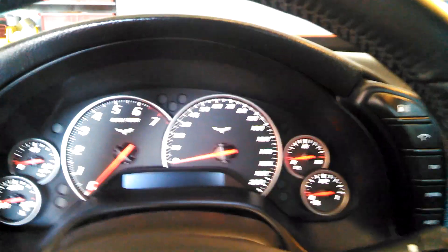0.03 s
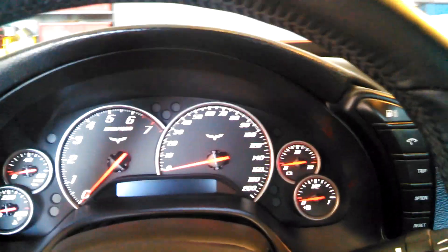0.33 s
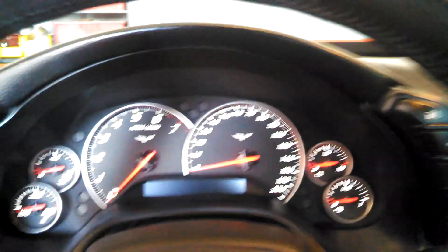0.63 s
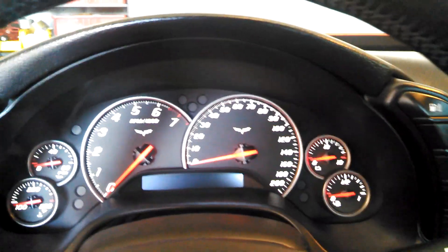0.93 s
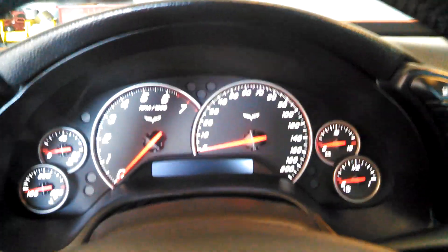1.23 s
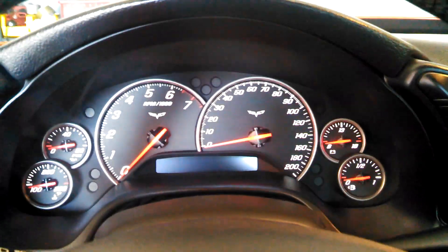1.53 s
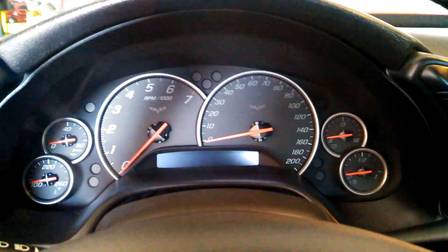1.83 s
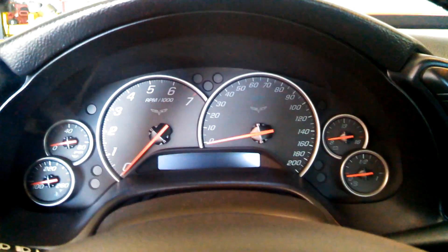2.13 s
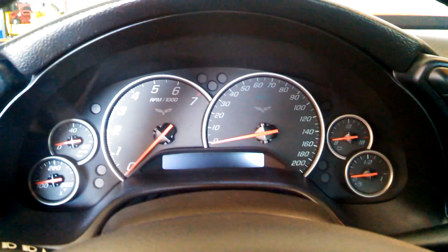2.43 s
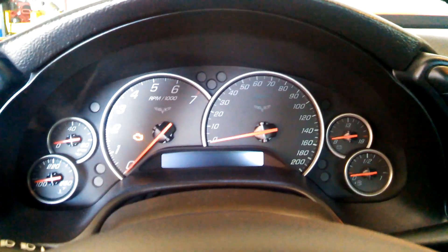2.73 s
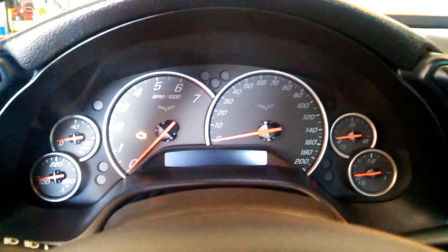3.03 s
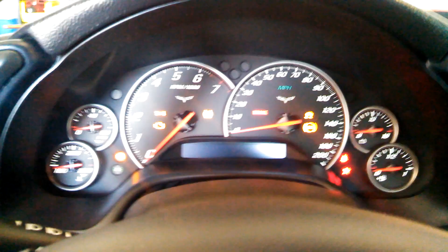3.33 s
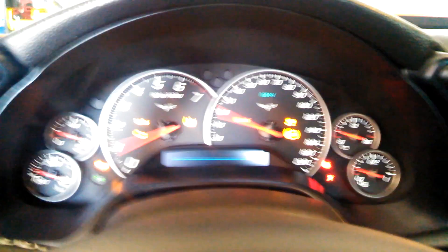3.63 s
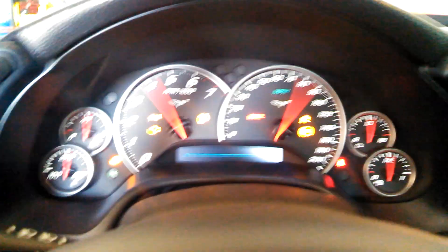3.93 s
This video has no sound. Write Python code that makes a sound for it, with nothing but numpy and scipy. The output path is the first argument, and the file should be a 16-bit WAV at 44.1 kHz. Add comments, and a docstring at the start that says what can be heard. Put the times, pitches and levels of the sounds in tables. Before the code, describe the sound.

A car engine cranks briefly and fires into a low, uneven roar that booms in the cabin. Before it come close handling rustle and knocks, two loud ignition pops with spits of hiss, and a faint fuel pump whir.

```python
"""Cold start of a V8 car

From the driver's seat, a hand rustles on a camera and knocks its buttons. Two sharp electrical
pops come with the ignition, among clicks and spits of hiss. The fuel pump whirs and the starter
heaves through four compressions. The engine catches, flares and settles, booming in the cabin."""
import sys
import numpy as np
from scipy import signal
from scipy.fft import rfft, irfft
from scipy.io import wavfile
from scipy.ndimage import uniform_filter1d

SR = 44100
rng = np.random.default_rng(int(sys.argv[2]) if len(sys.argv) > 2 else 0)


def generate_wav(signal):
    """Clip the signal to [-1, 1] and save it as 16-bit WAV at the path in sys.argv[1]."""
    frames = np.transpose(np.atleast_2d(signal))
    scaled = np.clip(frames, -1, 1) * 32767
    pcm = np.round(scaled).astype(np.int16)
    wavfile.write(sys.argv[1], SR, pcm)


N = 176400
T, HZ = np.arange(N) / SR, np.fft.rfftfreq(N, 1 / SR)
PORT_DELAY = 16  # samples between the two microphone openings


def amp(db):
    """Turns decibels into a gain."""
    return 10 ** (np.asarray(db) / 20)


def unit(x):
    """Scales a signal to an average (rms) level of 1."""
    return x / np.sqrt(np.mean(x ** 2) + 1e-20)


def shape(points):
    """Draws a gain for every frequency through (Hz, dB) points."""
    hz, db = np.transpose(points)
    return amp(np.interp(np.log(HZ + 1), np.log(hz), db))


def levels(rows):
    """Draws a gain over time for each dB column of a table."""
    s, *columns = np.transpose(rows)
    return [amp(np.interp(T, s, db)) for db in columns]


def band(lo_hz, hi_hz):
    """A gain that falls steeply outside two frequencies."""
    return 1 / np.sqrt((1 + (lo_hz / (HZ + 1)) ** 10) * (1 + (HZ / hi_hz) ** 10))


def tint(x, gain):
    """Filters a sound and scales it to level 1."""
    return unit(irfft(rfft(x) * gain, N))


def noise():
    """White noise in two rows: mid (what left and right share) and side (how they differ)."""
    return rng.standard_normal((2, N))


def wander(rate_hz):
    """A random wobble of level 1, mostly slower than rate_hz."""
    return tint(rng.standard_normal(N), 1 / (1 + (HZ / rate_hz) ** 4))


def add(mix, s, sound):
    """Lays a sound into the mix at s seconds."""
    part = mix[:, max(round(s * SR), 0):][:, :sound.shape[1]]
    part += sound[:, :part.shape[1]]


def hiss(flicker_db=1.12):
    """Bright, slightly grainy hiss."""
    # The tone of the hiss. Each row: frequency in Hz, gain in dB.
    colour = [(300, 5), (1200, -2), (2200, -2.5), (3000, -2), (4200, 0), (5700, -2), (7800, -0.5),
              (10000, -5.5), (11200, -7), (12800, 0.5), (15500, -2.5)]
    return tint(noise(), shape(colour) * band(540, 21000)) * amp(flicker_db * wander(67))


def handling(rumble_side_db=4, scrub_db=2):
    """A hand shifts on the camera, rumbling and rubbing unevenly over faint hiss."""
    # The rustle, early and late. Each row: time in seconds, then rumble, rub and treble in dB.
    early = [(0.0, -39, -56, -54.5), (0.1, -46, -45.5, -52), (0.17, -38.5, -39, -49.5),
             (0.225, -42, -50.5, -48.5), (0.284, -42, -55, -54.5), (0.41, -50.5, -57.5, -59.5),
             (0.542, -52, -58.5, -58.5), (0.698, -51.5, -59.5, -58.5), (1.15, -60.5, -60, -62.5),
             (1.38, -56, -60.5, -64.5)]
    late = [(1.42, -47, -47.5, -61.5), (1.52, -58, -56, -60.5), (1.75, -55, -54.5, -56.5),
            (1.79, -44, -43, -58), (1.9, -47, -47.5, -57.5), (1.98, -51.5, -55, -57)]
    # The tone of the rustle. Each row: frequency in Hz, gain in dB.
    colour = [(25, -10), (45, -5.5), (85, 5.5), (125, -1.5), (200, 3), (300, -4), (550, -6.5), (800, -10),
              (1200, -15), (1800, -19), (3000, -10)]
    rumble_gain, rub_gain, treble_gain = levels(list(early) + list(late))
    rumble = tint(noise(), shape(colour) * band(20, 365)) * amp([[0], [rumble_side_db]])
    rub = tint(noise(), shape(colour) * band(230, 2240)) * amp(scrub_db * wander(64))
    treble = tint(hiss(), shape([(2000, 0), (4500, -2), (7500, -3.5), (10500, -0.5), (14000, -1)]))
    return amp(-2) * rumble_gain * rumble + amp(1) * rub_gain * rub + amp(4) * treble_gain * treble


def knocks(clack_hz=1330, blow_hz=520, blow_s=0.00041, rise_s=0.0015):
    """Blunt taps on plastic: a short blow, a low ringing body, a clack and a faint tick."""
    # Each row is a tap: start in seconds, then blow, body, clack and tick in dB, ring length factor.
    taps = [(0.1098, -16.5, -33.5, -32, -37.5, 0.55), (0.266, -42, -45, -60, -62, 0.86),
            (0.327, -43, -42.5, -58, -63, 1), (0.405, -41, -41, -60, -60, 0.9),
            (0.425, -48, -47.5, -66, -63, 0.97), (0.44, -52, -49, -66, -61, 0.94),
            (0.575, -50, -47.5, -53, -60, 0.46), (0.675, -43, -45.5, -60, -65, 0.32),
            (0.737, -59, -66, -41.5, -46.5, 0.83), (0.747, -55, -59, -45, -57, 0.75),
            (1.266, -34, -36, -51, -51, 0.96), (1.418, -37, -43, -38.5, -39, 0.76),
            (1.867, -40, -32, -54, -62, 0.62)]
    # How the plastic rings. Each row: pitch in Hz, level in dB, seconds to fade by 60 dB (t60).
    modes = [(197, -10.5, 0.31), (403, -7, 0.069), (545, 8, 0.044), (690, -4, 0.023)]
    thump_t60, clack_t60, tick_t60 = 0.15, 0.064, 0.051
    out, t = np.zeros((2, N)), np.arange(SR // 5) / SR
    rattles, ticks, thumps = tint(noise(), band(850, 2300)), hiss(), tint(noise(), band(270, 750))
    for s, blow_db, body_db, clack_db, tick_db, ring_length in taps:
        here = slice(round(s * SR), round(s * SR) + len(t))
        age = t / max(ring_length, .1)  # a small factor speeds up the fades
        detune = 1 + 0.064 * rng.standard_normal(len(modes))
        ring = sum(amp(db - 60 * age / t60) * np.sin(2 * np.pi * hz * d * t)
                   for (hz, db, t60), d in zip(modes, detune))
        body = ring * np.array([[1], [.3]]) + 0.93 * thumps[:, here] * amp(-60 * age / thump_t60)
        clack = np.sin(2 * np.pi * clack_hz * t) * np.array([[1], [0]]) + 0.55 * rattles[:, here]
        sound = amp(body_db + 2) * body * np.minimum(t / rise_s, 1)
        sound += amp(clack_db + 2 - 60 * age / clack_t60) * clack
        sound += amp(tick_db + 4 - 60 * age / tick_t60) * ticks[:, here]
        sound[0] += amp(blow_db) * np.sin(2 * np.pi * blow_hz * t) * t / blow_s * np.exp(1 - t / blow_s)
        add(out, s + .002, sound * np.minimum(t / .0004, 1))
    return out


def scrape(grain_db=1.5):
    """Skin slides over plastic in a bright, fine-grained scrape."""
    # The slide of the hand. Each row: time in seconds, level in dB.
    slide = [(0.11, -85), (0.13, -43), (0.16, -37.5), (0.2, -42.5), (0.26, -56), (0.31, -57), (0.39, -49.5),
             (0.437, -51.5), (0.465, -66), (0.62, -62), (0.72, -84)]
    # The tone of the scrape. Each row: frequency in Hz, gain in dB.
    colour = [(1400, -2), (4000, -6), (6800, 2.5), (10000, 3), (14500, -0.5)]
    level, = levels(slide)
    return level * amp(grain_db * wander(300)) * tint(hiss(), shape(colour))


def pops(fall_s=.0035, cut_hz=54, left_share=.8):
    """As the ignition comes on, the voltage jumps and swings back, opposite in left and right."""
    # Each row is a pop: start in seconds, level in dB.
    jumps = [(1.4643, -4), (1.9175, 3.5)]
    # Each pop's rise time in seconds; the louder one is steeper.
    rises = [.00009, .00002]
    out, t = np.zeros((2, N)), np.arange(SR // 6) / SR
    bass_cut = signal.butter(4, cut_hz, "highpass", fs=SR, output="sos")
    for (s, db), rise_s in zip(jumps, rises):
        right = signal.sosfilt(bass_cut, (1 - np.exp(-t / rise_s)) * np.exp(-t / fall_s))
        left = -left_share * np.pad(right, (PORT_DELAY, 0))[:len(t)]
        add(out, s, amp(db) * np.array([left, right]))
    return out


def spits(snap_s=0.0029, grain_db=1.2):
    """Short snaps and spits of hiss; the last is microphone hiss following the second pop."""
    # Each row: start in seconds, snap and hiss in dB, seconds held, seconds to fade by 60 dB.
    bursts = [(1.558, -41, -38.5, 0.025, 0.32), (1.6613, -32, -41, 0.014, 0.084),
              (1.687, -40, -42.5, 0.0088, 0.053), (1.7413, -39, -39, 0.009, 0.06),
              (1.918, -56, -34, 0.044, 0.14)]
    level = np.zeros(N)
    for s, snap_db, hiss_db, hold_s, t60 in bursts:
        t = np.maximum(T - s, 0)
        level += amp(snap_db) * t / snap_s * np.exp((1 - (t / snap_s) ** 2) / 2)
        level += np.minimum(t / .001, 1) * amp(hiss_db - 60 * np.maximum(t - hold_s, 0) / t60)
    colour = shape([(400, -8), (1500, 3), (4000, 3.5), (7000, -1), (14000, 2.5)])
    return level * amp(grain_db * wander(740)) * tint(hiss(), colour)


def fuel_pump(tone_boost_db=43, hiss_db=-4.5, waver=0.00554, flutter_db=3):
    """The fuel pump spins with wavering, fluttering tones inside a noisy whir."""
    # The pump's loudness. Each row: time in seconds, level in dB.
    loudness = [(1.91, -83), (1.935, -33.5), (2.05, -42), (2.19, -37.5), (2.34, -43), (2.8, -32.5),
                (3, -69)]
    # Its tones. Each row: pitch in Hz, level in dB before the boost.
    whine = [(188.4, -57), (640.6, -57), (899.0, -57.5), (1432, -57.5)]
    # Its whir. Each row: frequency in Hz, gain in dB.
    colour = [(40, -27), (180, -12), (400, -15.5), (650, -3), (1400, -5), (2100, -8.5), (2800, 1),
              (5000, -19.5)]
    level, = levels(loudness)
    tones = np.zeros((2, N))
    for hz, db in whine:
        turns = np.cumsum(hz * (1 + waver * wander(38.7))) / SR
        gain = amp(db + tone_boost_db + flutter_db * wander(38))
        tones += gain * np.sqrt(2) * np.sin(2 * np.pi * (turns + rng.random((2, 1))))
    return level * (tones + tint(noise(), shape(colour)) + amp(hiss_db) * hiss())


def through_cabin(drive):
    """Sound from the engine bay rings the cabin and arrives as low thud, boom and higher roar."""
    # Where the cabin and car body ring. Each row: frequency in Hz, peak strength in dB.
    resonances = [(64, 11), (144, 9), (186, 8.5), (219, 8.5), (264, 5.5), (330, 12), (355, 13), (385, 5),
                  (481, 4.5), (611, 8), (676, 7.5), (760, 8), (796, 7), (820, 8), (891, 8), (995, 6),
                  (1206, 3.5), (1350, 4), (1435, 8.5)]
    # The broad tone of the path to the seat. Each row: frequency in Hz, gain in dB.
    colour = [(25, -38), (38, -31), (54, -11), (120, -5), (300, -1.5), (420, -5.5), (540, -3), (700, 0),
              (950, -5.5), (1300, 0), (1700, -8), (2200, -14), (3000, -7)]
    peaks = 0
    for hz, db in resonances:
        width_hz = 8.6 + 0.0047 * hz
        peaks += amp(db + 1) ** 2 / (1 + (2 * (HZ - hz) / width_hz) ** 4)
    path = shape(colour) * np.sqrt(1 + peaks)
    return [tint(drive, path * band(lo, hi)) for lo, hi in [(20, 110), (110, 420), (420, 2800)]]


def starter(groan_hz=186, groan_db=-3, rise_s=0.025, release_s=0.051):
    """Each compression gives a thud and a groan of gears; microphone hiss swells with each one."""
    # Each row: start and length in seconds, then thud, boom, gears and microphone hiss in dB.
    strokes = [(2.353, 0.1, -45, -31.5, -33, -32), (2.487, 0.088, -38, -34.5, -29, -30),
               (2.602, 0.08, -36, -28, -32, -29), (2.704, 0.078, -35.5, -23.5, -25, -27)]
    fades_db = [-3.5, -13, -5.5, -6]  # how those four layers fade over a stroke
    thud, boom, gears = through_cabin(noise() * amp(1.6 * wander(87)))
    turns = np.cumsum(groan_hz * (1 + 0.0404 * wander(30.8))) / SR
    groan = np.sin(2 * np.pi * (turns + rng.random((2, 1))))
    boom = unit(tint(boom, band(160, 230)) + amp(groan_db) * unit(groan))
    layers, out = (thud, boom, gears, hiss()), np.zeros((2, N))
    for s, length, *dbs in strokes:
        t = np.clip(T - s, 0, length + release_s)
        swell = np.minimum(t / rise_s, 1) * np.clip(1 - (t - length) / release_s, 0, 1)
        for db, fade_db, layer in zip(dbs, fades_db, layers):
            out += swell * amp(db + fade_db * t / length) * layer
    return out


def smear(x, mean_delay_s=.012):
    """Paths of different length spread each pulse out in time."""
    delay = mean_delay_s * (1 + np.sin(HZ / 37))
    return tint(x, np.exp(-2j * np.pi * np.cumsum(delay) * SR / N))


def engine(noise_share=0.78, uneven_db=1.33, puff_cycles=0.66, catch_s=2.797):
    """Uneven firings, each a pressure pulse and a puff of noise, ring the cabin."""
    # The engine's speed. Each row: time in seconds, firings per second.
    speed = [(2.8, 41.3), (2.87, 82), (2.95, 110.5), (3.07, 131), (3.25, 117.4), (3.55, 88), (3.85, 79),
             (4, 68.4)]
    # Each cylinder's strength in dB, in firing order.
    cylinders = [-8, -6, -6, -7, -7, -6, -7, -6]
    # Each row: time in seconds, the engine's thud, boom and roar in dB,
    # then microphone hiss in dB, swelling with each surge.
    loudness = [(2.815, -23, -35, -33, -29), (2.856, -25, -19.5, -20.5, -27),
                (2.88, -34, -14.5, -20, -28.5), (2.905, -45, -13.5, -14.5, -25),
                (2.954, -39, -23.5, -19.5, -31.5), (3.025, -32, -16, -23, -36.5),
                (3.058, -33, -20, -19, -32), (3.124, -44, -24.5, -27, -43.5),
                (3.154, -40, -19, -19.5, -30.5), (3.214, -51, -28, -26, -39.5),
                (3.268, -36, -31.5, -29.5, -45), (3.286, -35, -19.5, -31.5, -39),
                (3.33, -38, -22, -32, -42), (3.355, -44, -31.5, -33, -38), (3.43, -40, -28, -29.5, -38),
                (3.472, -33, -34.5, -31, -40.5), (3.5, -30, -33, -30, -33.5), (3.558, -39, -36, -36, -42),
                (3.608, -31, -36, -27.5, -37.5), (3.648, -44, -32, -38.5, -42), (3.67, -26, -23, -30, -32),
                (3.778, -33.5, -26.5, -22.5, -33), (3.798, -34, -27, -33.5, -33.5),
                (3.822, -27, -22.5, -20.5, -32), (3.87, -34, -22, -21, -27.5),
                (3.915, -34, -25, -27.5, -36), (3.952, -38, -26.5, -28, -41),
                (3.976, -41, -23.5, -23, -29.5), (3.99, -23, -29, -25, -28.5)]
    rate = np.interp(T, *np.transpose(speed))
    cycles = np.cumsum(rate * (1 + .02 * wander(18.92))) / SR
    firing = cycles.astype(int)
    strength = amp(np.take(cylinders, firing, mode="wrap") + uneven_db * rng.standard_normal(N)[firing])
    pulses = smear(strength * np.diff(firing, prepend=0) / np.sqrt(rate))
    puff_mid, puff_side = unit(strength * (0.79 + np.exp(-(cycles % 1) / puff_cycles)) * noise())
    mid = np.sqrt(1 - noise_share) * pulses + np.sqrt(noise_share) * puff_mid
    thud, boom, roar = through_cabin(np.array([mid, puff_side]))
    thud_gain, boom_gain, roar_gain, mic_hiss_gain = levels(loudness)
    sound = amp(-1) * thud_gain * thud + amp(-4.5) * boom_gain * boom + amp(-2.4) * roar_gain * roar
    sound += exhaust_drone(boom_gain) + amp(4.5) * mic_hiss_gain * hiss()
    return np.clip((T - catch_s) / 0.016, 0, 1) * sound


def exhaust_drone(boom_gain, smooth_s=0.096, waver=0.00937):
    """The exhaust holds two close, beating tones that slowly follow the boom's loudness."""
    # Each row is an exhaust tone: pitch in Hz, level in dB relative to boom_gain.
    pitches = [(331, -10), (352, -11)]
    tones = np.zeros(N)
    for hz, db in pitches:
        turns = np.cumsum(hz * (1 + waver * wander(22))) / SR
        tones += amp(db) * np.sqrt(2) * np.sin(2 * np.pi * turns)
    return tones * uniform_filter1d(boom_gain, round(smooth_s * SR)) * np.array([[1], [.5]])


def microphone(mid_side, leak=0.0032, notch=0.16):
    """Two close openings feed each other and cancel some frequencies; returns left and right."""
    # Stereo width. Each row: frequency in Hz, gain of the side against the mid in dB.
    width = [(30, 5), (60, 2), (110, -1), (200, -2), (380, -4.5), (700, -3), (1300, 0), (2400, 0),
             (15000, 0)]
    angle = np.pi * HZ * PORT_DELAY / SR
    mid_gain = np.where(angle < np.pi / 2, 1, abs(np.sin(angle)))
    mid_gain *= mid_gain / np.hypot(mid_gain, notch)  # widens the dips
    side_gain = abs(np.cos(angle)) * shape(width)
    mid, side = irfft(rfft(mid_side) * np.hypot([mid_gain, side_gain], leak), N)
    return np.array([mid + side, mid - side]) * amp([[-.3], [.3]])


def scene():
    """Everything heard from the driver's seat; the electrical pops skip the microphone."""
    mix = handling() + scrape() + knocks() + spits() + fuel_pump() + starter() + engine()
    return microphone(mix) + pops()


def record(dry):
    """Flattens peaks beyond full scale and cuts the highest treble."""
    cut_hz = 15600
    treble_cut = signal.firwin(511, cut_hz, window=("kaiser", 9), fs=SR)
    return signal.oaconvolve(np.clip(dry, -1, 1), treble_cut[None], "same")


dry = scene()
out = record(dry)
generate_wav(out)
```